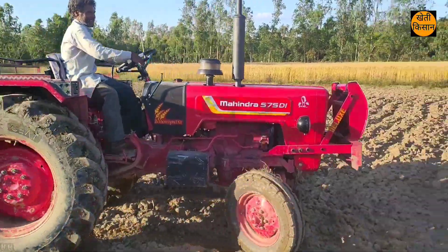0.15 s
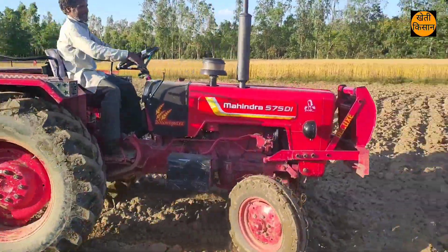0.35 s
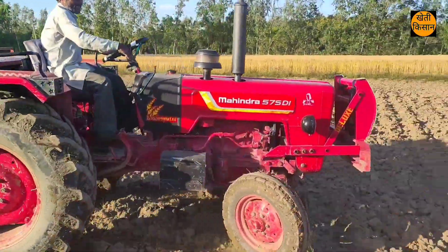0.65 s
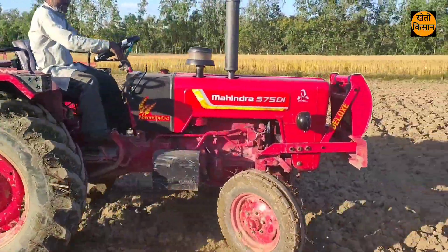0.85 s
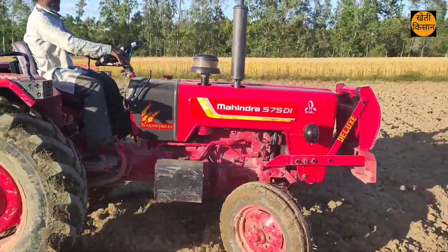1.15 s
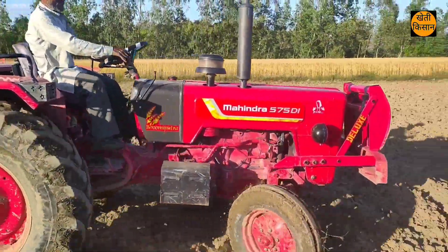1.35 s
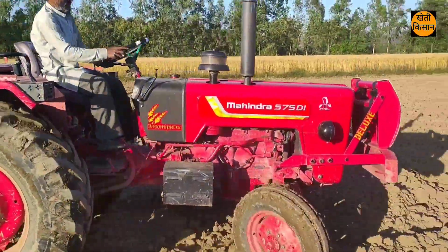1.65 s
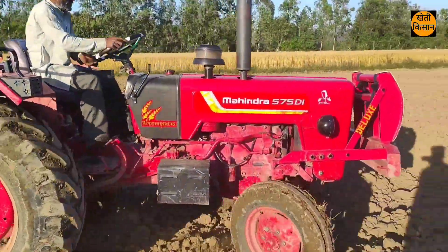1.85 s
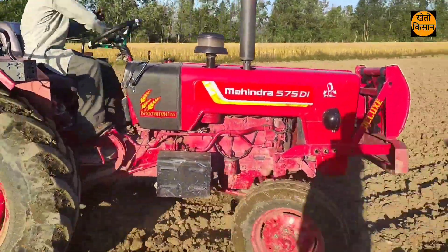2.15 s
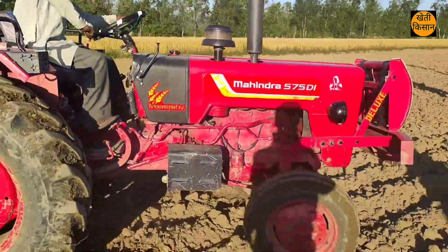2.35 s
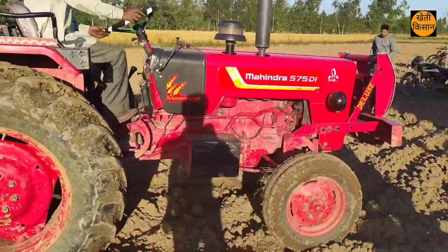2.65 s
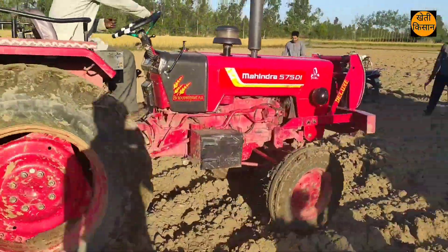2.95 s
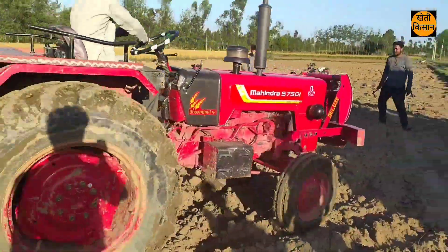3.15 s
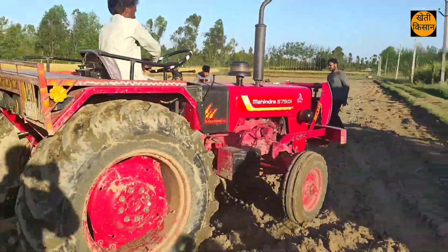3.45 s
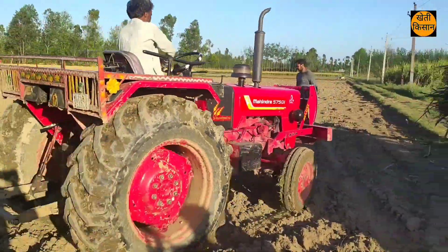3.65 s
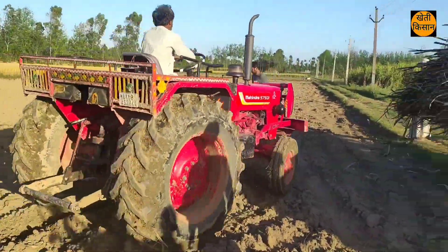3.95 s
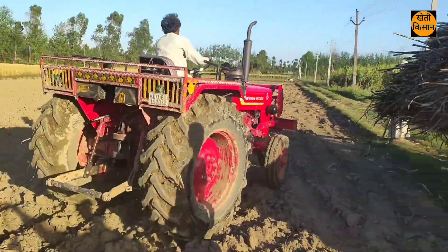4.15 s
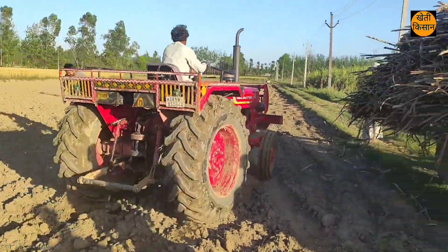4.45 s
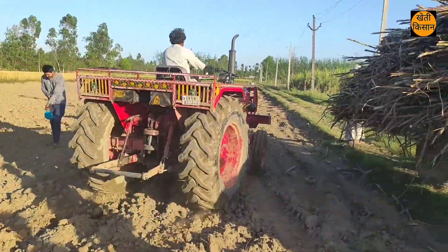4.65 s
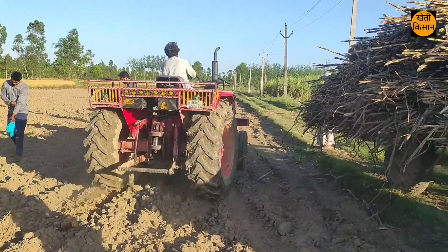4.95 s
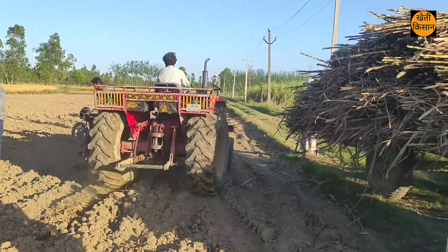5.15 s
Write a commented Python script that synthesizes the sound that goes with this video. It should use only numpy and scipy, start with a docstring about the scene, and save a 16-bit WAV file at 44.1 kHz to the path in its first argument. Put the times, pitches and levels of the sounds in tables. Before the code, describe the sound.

A four-cylinder diesel tractor works close by in an open field, recorded outdoors in stereo with little reverberation. Around thirty firings a second make a deep fluttering thump with barking exhaust, low roar and metallic clatter. A couple of bright clinks come at the start; the speed rises briefly, then sags to its slowest near 0.75 s. From about 0.9 s it picks up and pulls hard, the treble knock crisp and ringing, sharpest from 1.2 to 1.9 s. Panels rattle, a hollow body boom comes and goes, and a faint hum swells at 1 s. Small iron clinks follow at 2.1 s and around 2.8 s. From 2.3 to 4 s it turns away and the knock dulls. Distant hollow toots, about four per second, become clearer from 2.8 s. After 4.4 s the engine revs noticeably higher; wind bumps the microphone from 4.7 s and the linkage clanks at 5.1 s.

```python
"""A four-cylinder diesel tractor pulls past at close range and drives off over a ploughed field.
From the start each firing gives an exhaust thump and bark, a burst of clatter and, under load, a hiss-like knock.
Far off, a slow stationary engine toots through its exhaust pot, like a blown bottle, about four times a second.
As the tractor passes, resonant panels rattle, iron clinks and the body booms at random; a faint tone hums once.
Then it turns its back, dulling the knock; near the end the engine speeds up, wind bumps and the linkage clanks."""
import sys
import numpy as np
from scipy import signal
from scipy.fft import rfft, irfft, next_fast_len
from scipy.io import wavfile
from scipy.ndimage import uniform_filter1d

SR = 44100
rng = np.random.default_rng(int(sys.argv[2]) if len(sys.argv) > 2 else 0)


def inscribe(sig):
    """Save sig as 16-bit PCM at rate SR to the path in sys.argv[1].

    A 1-D sig is mono; a 2-D sig holds one channel per row.
    Samples are clipped to [-1, 1] before scaling.
    """
    pcm = np.round(np.clip(np.atleast_2d(sig).T, -1, 1) * 32767)
    wavfile.write(sys.argv[1], SR, pcm.astype(np.int16))


N = 233579
TIME = np.arange(N) / SR

# engine speed, hunting around the governor's setting: [t/s, firing rate/Hz]
FIRING_RATE = [(0.0, 27.82), (0.304, 32.7), (0.534, 26.08), (0.564, 26.21), (0.743, 23.84), (1.345, 31.58),
               (1.467, 30.47), (1.913, 32.07), (2.057, 30.87), (2.259, 32.41), (2.661, 33.5),
               (2.812, 30.99), (2.955, 34.35), (3.07, 31.64), (3.309, 32.1), (3.444, 34.61), (3.629, 30.73),
               (3.846, 33.77), (4.105, 31.66), (4.288, 33.33), (4.483, 39.77), (4.904, 44.95), (5.3, 42.24)]
# engine along the drive: [t/s, roar before load and trim/dB, clatter re roar before load and trim/dB, dullness 0-1]
ENGINE_LEVEL = [(0, -33, -11, 0.96), (.25, -31, -9, 0.7), (.45, -36, -8, 0.65), (.8, -35, -8.5, 0.62),
                (1.0, -32, -9.5, 0.13), (1.45, -31.5, -9.5, 0.2), (1.8, -30, -9, 0.33),
                (2.15, -31.5, -6.5, 0.24), (2.7, -31.5, -7.5, 0), (2.92, -30, -11.5, 0.25),
                (3.0, -34, -11, 0.46), (3.1, -30.5, -12.5, 0.73), (3.23, -33, -13.5, .6),
                (3.4, -32, -9.5, 0.75), (3.49, -34, -9.5, 0.86), (3.7, -31.5, -12.5, .8),
                (4.2, -35, -10, 0.8), (4.55, -31, -12.5, 0.89), (4.9, -30.5, -14, 0.87),
                (5.08, -33, -12.5, 0.91), (5.3, -37.5, -12, 0.89)]
# spectrum of the combustion knock: [f/Hz, relative density/dB]
KNOCK_SPECTRUM = [(1500, -17), (2600, -24), (3800, -24.5), (4900, -16.5), (5500, -13.5), (5850, -6),
                  (6300, -6), (6680, -6.5), (6900, -1.5), (7300, -4), (7600, -2.5), (8000, -20.5),
                  (9000, -18.5)]
# modes of the engine's metal that the knock rings: [f/Hz, width/Hz, level/dB]
METAL_MODES = [(4280, 90, 1), (5630, 120, -5.5), (6410, 120, 0.5), (6730, 120, -1.5), (7170, 83, 0.5),
               (7440, 170, 2.5), (7600, 150, -6.5)]
# the two microphone ports: [f/Hz, likeness 0-1, left lead/rad, left minus right/dB]
PORT_RESPONSE = [(59.7, 0.99, 1, 2.5), (227, 1, -1.43, -1.5), (338, 0.96, 0.59, 0.5), (493, 0.5, 0.68, 0),
                 (610, 0.99, 0.88, -6.5), (900, 0.54, -0.5, 3.5), (1270, 0.4, -2, -2), (1890, 0.35, -2, 1),
                 (2900, 0.13, -3, 1), (4560, 0.3, -5.5, -4), (6800, 0.3, -5, -14), (8000, 0.4, -4.5, -25.5)]


def amp(db):
    """Decibels are logarithmic: 20 dB is a tenfold gain in amplitude."""
    return 10 ** (np.asarray(db) / 20)


def evened(x):
    """Normalisation to rms 1 (of the mid signal, for a pair)."""
    mid = np.atleast_2d(x).mean(0)
    return x / np.sqrt(np.mean(mid ** 2) + 1e-20)


def curve(rows, axis=1):
    """Linear interpolation of one column of a time table, at every sample."""
    rows = np.array(rows)
    return np.interp(TIME, rows[:, 0], rows[:, axis])


def read(rows, hz, axis=1):
    """Interpolation of one column of a frequency table, on a log axis."""
    rows = np.array(rows)
    return np.interp(np.log(hz + 1), np.log(rows[:, 0] + 1), rows[:, axis])


def add(mix, s, sound):
    """Superposition: mixes a sound in at a time."""
    part = mix[max(round(s * SR), 0):][:len(sound)]
    part += sound[:len(part)]


def drift(rate_hz):
    """Low-passed Gaussian noise of rms 1, varying at rates up to about the given one."""
    size = next_fast_len(N)
    hz = np.fft.rfftfreq(size, 1 / SR)
    spectrum = rfft(rng.standard_normal(size)) / (1 + (hz / rate_hz) ** 4)
    return evened(irfft(spectrum, size)[:N])


def noise(spectrum, likeness=1):
    """Coloured noise, partly coherent between two spaced ports, with phase and level differences."""
    size = next_fast_len(N)
    hz = np.fft.rfftfreq(size, 1 / SR)
    a, b = rfft(rng.standard_normal((2, size)))
    same = np.clip(likeness * read(PORT_RESPONSE, hz), 0, 1)
    lead = np.exp(1j * read(PORT_RESPONSE, hz, axis=2))
    tilt = amp(read(PORT_RESPONSE, hz, axis=3))
    left = tilt * lead * (same * a + np.sqrt(1 - same ** 2) * b)
    pair = np.array([left, a]) / np.sqrt(1 + tilt ** 2)
    return evened(irfft(pair * amp(read(spectrum, hz)), size)[:, :N])


def sides(hz):
    """Level difference between the ports: left and right gains at one frequency, of mean 1."""
    gains = np.array([[amp(read(PORT_RESPONSE, hz, axis=3))], [1]])
    return gains / gains.mean()


def ring(x, modes):
    """Modal resonance: convolution with decaying cosines [f/Hz, width/Hz, level/dB]."""
    t = np.arange(SR // 20) / SR
    response = sum(amp(db) * np.exp(-np.pi * width * t) * np.cos(2 * np.pi * hz * t)
                   for hz, width, db in modes)
    return signal.oaconvolve(x, response[None], axes=1)[:, :x.shape[1]]


def bursts(firings, start, rise, decay, between, uneven_db):
    """Cyclic excitation of rms 1: jumps and decays once a firing (times as shares of a firing)."""
    index, age = np.divmod(firings - start + 2, 1)
    size = amp(uneven_db * np.clip(rng.standard_normal(256), -2, 2))[index.astype(int)]
    shape = (1 - np.exp(-(age / rise) ** 2)) * np.exp(-age / decay)
    return evened(size * shape + between)


def turned():
    """Source aspect: 0 while the tractor is side-on, 1 once heard from behind."""
    start_s, end_s = 2.3, 4.03
    return np.clip((TIME - start_s) / (end_s - start_s), 0, 1)


def fuel_db():
    """Force balance: fuel meets the drag, rising as the engine gains speed and falling as it slows."""
    # drag of the soil and drive train: [t/s, level re full load/dB]
    drag = [(0, -34), (.09, -3.5), (.15, -4.5), (.3, -15), (.42, -11.5), (.49, -18.5), (.56, -19.5),
            (.64, -22), (.76, -21.5), (.835, -11.5), (.875, -31.5), (.915, -4), (1.2, -6), (1.45, -4.5),
            (1.8, -3.5), (1.96, -5), (2.22, -8.5), (2.45, -15), (2.9, -11), (3.02, -11), (3.12, -4.5),
            (3.25, -14.5), (3.38, -13), (3.53, -13), (3.8, -10), (4.5, -10.5), (4.9, -10), (5.3, -27)]
    averaging_s = 0.05  # the governor's reaction time
    db_per_accel = 0.6344  # dB per firing per second gained in a second
    accel_limit = 12.1  # firings/s^2 at which the fuel rack nears its stops
    accel = uniform_filter1d(np.gradient(curve(FIRING_RATE)) * SR, round(averaging_s * SR))
    return curve(drag) + db_per_accel * accel_limit * np.tanh(accel / accel_limit)


def wind():
    """Turbulent pressure: short low swells, mostly independent at each port, strongest in the deep bass."""
    # bumps on the microphone: [t/s, level/dB, length/s, top f/Hz, left minus right/dB]
    gusts = [(4.737, -23, .018, 420, -16.5), (4.757, -25, .04, 110, -18), (4.888, -20.5, .03, 150, -10),
             (4.908, -19, .03, 400, -14), (4.912, -25, .03, 61, 10), (4.932, -17, .02, 220, 4),
             (4.96, -18, .06, 131, -11), (5.028, -22.5, .026, 202, -22.5), (5.072, -21, .035, 151, 3),
             (5.16, -24, .17, 176, -5), (5.23, -25.5, .03, 130, 14)]
    out = np.zeros((2, N))
    hz = np.fft.rfftfreq(SR, 1 / SR)
    for s, db, length, top_hz, pan_db in gusts:
        near = abs(TIME - s) < 1.5 * length
        swell = np.exp(-(2 * (TIME[near] - s) / length) ** 2)
        spectra = rfft(rng.standard_normal((3, SR))) / (1 + (hz / top_hz) ** 4)
        spectra = spectra / np.sqrt(1 + 2 * hz / top_hz)
        left, right, both = irfft(spectra)[:, :len(swell)]
        eddies = np.array([evened(swell * (.4 * both + .9 * own)) for own in (left, right)])
        port_db = db + np.array([[pan_db], [-pan_db]]) / 2
        out[:, near] += amp(port_db) * np.sqrt(np.mean(swell ** 2)) * eddies
    return out


def toot(hz, swell, sag):
    """Cavity resonance: a rough puff blows the exhaust pot like a bottle; the note sags as it dies."""
    t = np.arange(SR // 7) / SR
    pitch = hz * (1 + 0.0036 * rng.standard_normal())
    cycles = pitch * (t - sag * t ** 2) + rng.random()
    band = signal.butter(4, [280, 930], "band", fs=SR, output="sos")
    puff = evened(signal.sosfilt(band, rng.standard_normal(len(t))))
    envelope = (t / swell) ** 2 * np.exp(2 - 2 * t / swell)
    return envelope * (np.sin(2 * np.pi * cycles) + amp(-10) * puff)


def far_engine(count=22):
    """Periodic excitation: a toot each firing, and a weaker, higher one about half a cycle later."""
    # strength, hidden at times while the tractor passes in front: [t/s, level/dB]
    toot_level = [(.24, -32), (.48, -32.5), (.72, -27), (.95, -29), (1.42, -29), (1.66, -37), (1.9, -44),
                  (2.13, -29.5), (2.37, -40), (2.6, -31), (2.84, -25), (3.1, -25), (3.31, -24),
                  (3.55, -30.5), (3.8, -26), (4.03, -23), (4.27, -24), (4.5, -29), (4.74, -25.5),
                  (4.98, -26.5), (5.22, -27.5)]
    start_s, gap_s, stretch_s = .241, .2335, .00015  # the gaps lengthen slightly
    uneven_db = -1.5
    out = np.zeros(N)
    for k, luck in enumerate(rng.standard_normal(count)):
        s = start_s + gap_s * k + stretch_s * k ** 2
        db = np.interp(s, *np.transpose(toot_level)) + uneven_db * luck
        add(out, s - .006, amp(db) * toot(hz=422, swell=0.014, sag=0.41))
        add(out, s + .118, amp(db - 6) * toot(hz=452, swell=.012, sag=.6))
    return out * amp(0) * np.array([[1], [1]]) * amp([[-.5], [.5]])


def hum():
    """Amplitude modulation: one faint note of wavering phase swells and fades."""
    # [centre t/s, half-length/s, f/Hz, level/dB]
    s, half_length, hz, db = (1, 0.17, 453, -37)
    swell = np.exp(-((TIME - s) / half_length) ** 4)
    return amp(db) * swell * np.sin(2 * np.pi * hz * TIME + .3 * drift(20))


def clink(db, hz, t60, share):
    """Impact of iron on iron: one mode decays exponentially, with a share of chatter around it."""
    t, share = np.arange(SR // 4) / SR, np.clip(share, 0, 1)
    tone = np.sqrt(2) * np.sin(2 * np.pi * (hz * t + rng.uniform(0, .3, (2, 1))))
    chatter = evened(ring(rng.standard_normal((2, len(t))), [(hz, .2 * hz, 0)]))
    envelope = amp(db - 60 * t / t60) * (1 - np.exp(-t / .001))
    return (np.sqrt(1 - share) * tone + np.sqrt(share) * chatter) * envelope


def ironwork():
    """Modal superposition: single clinks over the bumps, and one linkage clank that rings all its modes."""
    # clinks of loose ironwork: [t/s, level/dB, f/Hz, t60/s]
    clinks = [(.05, -31, 6960, 0.03), (0.085, -29, 5470, .04), (0.086, -27, 7200, 0.03),
              (1.38, -42.5, 2290, 0.11), (2.122, -36.5, 2070, 0.065), (2.127, -33.5, 5740, 0.066),
              (2.287, -45, 2960, 0.055), (2.561, -40, 5670, 0.063), (2.772, -37, 2920, 0.052),
              (2.786, -38, 2660, 0.11), (3.87, -50, 2770, 0.1), (4.129, -43.5, 2900, 0.053),
              (4.378, -42, 2600, 0.044), (4.535, -42.5, 2430, 0.093), (4.948, -47.5, 2690, 0.081),
              (5.127, -44, 2505, 0.13)]
    # modes of the rear linkage: [f/Hz, level/dB, t60/s]
    linkage = [(3200, -49.5, 0.21), (3640, -54, 0.11), (4560, -50.5, 0.17), (5950, -46, 0.06),
               (6930, -41.5, 0.037), (7390, -53, 0.36)]
    clank_s = 5.076
    hits = [(*row, .15) for row in clinks]  # the last entry is the share of chatter
    hits += [(clank_s, db, hz, t60, .45) for hz, db, t60 in linkage]
    out = np.zeros((2, N))
    for s, db, hz, t60, share in hits:
        for port, heard in zip(out, sides(hz) * clink(db, hz, t60, share)):
            add(port, s, heard)
    return out


def panels(firings):
    """Forced plate vibration: uneven ticks ring loose sheet metal, densest after each firing."""
    # modes of the thin panels: [f/Hz, width/Hz, level/dB]
    panel_modes = [(2205, 110, 2), (2730, 83, 0), (3070, 130, 1), (3740, 170, -5.5), (4640, 100, -3),
                   (5260, 57, -2), (5800, 220, -1.5), (6720, 110, 6)]
    # rattle as the bonnet passes: [t/s, level/dB]
    rattle = [(0, -62), (.15, -59), (.36, -62), (.85, -65), (1.05, -46.5), (1.4, -49.5), (1.8, -51),
              (2.15, -55), (2.42, -63), (2.57, -42.5), (2.7, -63), (2.87, -46), (3.0, -63), (3.4, -58.5),
              (3.52, -63.5), (3.7, -57), (4.0, -67), (4.8, -57.5), (5.3, -76)]
    chance = 130 / SR * bursts(firings, start=.33, rise=.08, decay=.25, between=.2, uneven_db=4)
    size = amp(4.5 * np.minimum(rng.exponential(1, N), 2.5)) * rng.choice([-1, 1], (2, N))
    out = np.zeros((2, N))
    for hz, width, db in panel_modes:
        ticks = size * (rng.random(N) < chance)
        out += sides(hz) * ring(ticks, [(hz, width, db)])
    return amp(curve(rattle)) * evened(out)


def boom():
    """Narrow-band noise: random quadrature parts make a hollow bodywork boom that slides in pitch."""
    # the boom as the tractor passes: [t/s, f/Hz, level/dB]
    boom_track = [(0, 300, -46), (.85, 290, -45.5), (1.0, 288, -35), (1.15, 295, -34), (1.3, 330, -42.5),
                  (1.75, 320, -44.5), (2.0, 350, -38), (2.42, 355, -38), (2.55, 285.3, -34.5),
                  (2.72, 320, -39.5), (2.9, 340, -34.5), (3.1, 340, -40), (3.25, 320, -45.5),
                  (3.55, 280, -33.5), (3.66, 330, -49), (4.4, 340, -40.5), (4.52, 330, -38),
                  (4.63, 345, -48), (5.3, 350, -39.5)]
    width_hz = 26  # reach of the band to each side of its centre
    phase = 2 * np.pi * np.cumsum(curve(boom_track)) / SR + np.array([[.4], [0]])
    band = drift(width_hz) * np.cos(phase) + drift(width_hz) * np.sin(phase)
    return amp(curve(boom_track, axis=2)) * evened(band)


def hard_knocks():
    """Impulsive combustion: a charge ignites all at once, and its dry crack rings the metal's modes."""
    # knocks that stand out from the rest: [t/s, level/dB]
    sharp_knocks = [(.278, -36.5), (0.308, -41), (0.793, -40), (1.021, -33.5), (1.232, -34), (1.327, -30),
                    (1.424, -37), (1.491, -38), (1.555, -30), (1.585, -34), (1.682, -32), (1.715, -39),
                    (1.747, -32), (1.782, -27), (1.844, -31), (2.097, -37), (2.222, -33), (2.588, -43),
                    (2.838, -43), (2.867, -44)]
    rise_s, decay_s = 0.0016, 0.0025
    t, out = np.arange(SR // 25) / SR, np.zeros((2, N))
    hiss = noise(KNOCK_SPECTRUM)
    shape = (1 - np.exp(-(t / rise_s) ** 2)) * np.exp(-t / decay_s)
    mode_luck = rng.standard_normal((len(sharp_knocks), len(METAL_MODES)))
    for (s, db), luck in zip(sharp_knocks, mode_luck):
        crack = shape * hiss[:, round(s * SR):][:, :len(t)]
        # each knock has its own mix of modes
        modes = [(hz, width, mode_db + 3 * k) for (hz, width, mode_db), k in zip(METAL_MODES, luck)]
        blow = evened(evened(crack) + 0.87 * evened(ring(crack, modes)))
        blow = blow * np.sqrt(2 * decay_s / t[-1])
        for port, heard in zip(out, amp(db) * blow):
            add(port, s, heard)
    return out


def valve_gear(firings):
    """Impulse response: ticks of very uneven size ring the block, mostly just after each firing."""
    # modes of the engine block: [f/Hz, width/Hz, level/dB]
    block = [(1241, 55, 4), (1587, 48, -2), (1748, 110, 4), (2139, 70, -1), (2400, 330, -7),
             (2964, 80, -5.5)]
    chance = 160 / SR * bursts(firings, start=0.41, rise=0.088, decay=0.27, between=0.23, uneven_db=5.5)
    size = amp(5.9 * np.minimum(rng.exponential(1, (2, N)), 3)) * rng.choice([-1, 1], (2, N))
    return evened(sum(ring(size * (rng.random((2, N)) < chance), [mode]) for mode in block))


def engine_body(firings, fuel):
    """Modulated noise: upper roar and block clatter pulse with the firings over a steadier low roar."""
    # roar from the side and from the rear, and block clatter: [f/Hz, relative density/dB]
    roar_side = [(60, -5.5), (130, -3.5), (210, -1.5), (290, -0.5), (360, -1), (430, -5.5), (540, -7.5),
                 (720, -5), (950, -4), (1100, -20), (1400, -63.5), (2500, -58.5)]
    roar_rear = [(60, 4.5), (130, -1.5), (210, -1.5), (290, -1.5), (360, -1.5), (430, -1), (540, -6.5),
                 (720, -3), (900, -11.5), (1050, -26), (1400, -23.5), (2500, -76.5)]
    clatter_spectrum = [(600, -23), (1000, 8), (1240, 4.5), (1400, 3.5), (1620, 3), (2000, 3), (2130, -0.5),
                        (2350, 1), (2950, -4), (3400, -6), (4300, -10), (6000, -10), (8000, -41)]
    split_hz = 570  # below this the roar lingers between firings; above it, it chugs
    roar_per_fuel, clatter_per_fuel = 0.037, 0.066  # dB gained for each dB of fuel
    level = amp(curve(ENGINE_LEVEL) + roar_per_fuel * fuel)
    dull = np.clip(curve(ENGINE_LEVEL, axis=3), 0, 1)
    roar = np.sqrt(1 - dull) * noise(roar_side) + np.sqrt(dull) * noise(roar_rear)
    low = signal.sosfiltfilt(signal.butter(4, split_hz, fs=SR, output="sos"), roar)
    throb = bursts(firings, start=.32, rise=.12, decay=.5, between=1.8, uneven_db=3)
    chug = bursts(firings, start=.34, rise=.09, decay=.45, between=.55, uneven_db=1.5)
    clack = bursts(firings, start=.29, rise=.16, decay=.22, between=.35, uneven_db=3.5)
    clatter = noise(clatter_spectrum) * clack + amp(-2.5) * valve_gear(firings)
    clatter_db = -4.5 + curve(ENGINE_LEVEL, axis=2) + clatter_per_fuel * fuel
    pulsing_roar = low * throb + (roar - low) * chug
    return level * (amp(2.5) * pulsing_roar + amp(clatter_db) * clatter)


def knock(firings, fuel):
    """Combustion shock: a treble crack and ragged rebound under load blur into a softer chuff as it falls."""
    # strength in each cylinder, in firing order: [level/dB]
    cylinder_db = [-4, 0, .8, .3]
    full_load_db, shield_db = -37.5, -13  # side-on; change when heard from behind
    coast_db = -32  # knock that remains with no fuel, re the tabled roar
    pulling = amp(full_load_db + fuel + shield_db * turned())
    coasting = amp(curve(ENGINE_LEVEL) + coast_db)
    load_db = 20 * np.log10(np.hypot(pulling, coasting))
    hard = np.clip((load_db + 50) / 13, 0, 1)
    beat = firings + .015 * drift(20)  # the timing wanders
    cylinder = np.array(cylinder_db)[(beat + 1.7).astype(int) % 4]
    crack = bursts(beat, start=.37, rise=.04, decay=.075, between=.02, uneven_db=1)
    rebound = bursts(beat, start=.5, rise=.05, decay=.15, between=.025, uneven_db=2)
    rebound = rebound * amp(3 * drift(300))
    chuff = bursts(beat, start=.34, rise=.06, decay=.28, between=.18, uneven_db=2)
    sharp_power = .85 * crack ** 2 + .15 * evened(rebound) ** 2
    blow = np.sqrt(hard * sharp_power + (1 - hard) * chuff ** 2)
    # the drive of each mode wavers, so the blows favour different modes
    drive = blow * noise(KNOCK_SPECTRUM)
    metal = evened(sum(ring(drive * amp(2.8 * drift(20)), [mode]) for mode in METAL_MODES))
    return amp(load_db + hard * cylinder) * evened(blow * noise(KNOCK_SPECTRUM) + amp(0.5) * metal)


def orders(firings, table, lag, waver):
    """Fourier synthesis: engine orders, coloured by the pipe, line up in one pulse; each wavers by itself."""
    # response of the exhaust pipe: [f/Hz, gain/dB]
    pipe = [(15, -19), (25, -9), (32, -3.5), (41, 1), (63, 1.5), (85, 0.5), (160, -0.5), (195, -6.5),
            (230, -8), (350, -1.5)]
    rate = curve(FIRING_RATE)
    total = np.zeros(N)
    for k, db in table:
        level = amp(db + read(pipe, k * rate)) * (1 + waver * drift(15.0))
        total += level * np.cos(2 * np.pi * k * (firings - lag) + waver * drift(27))
    return evened(total)


def exhaust(firings, fuel):
    """Pulsating flow: a bark leads each firing, a deep suction swing follows, and turbulence rumbles."""
    # engine orders of the deep thump and of the bark above it: [multiple of firing rate, relative level/dB]
    thump_orders = [(.5, 0.5), (1, 10), (1.5, -15), (2, 7.5), (2.5, -35.5)]
    bark_orders = [(3, 5.5), (3.5, -21), (4, 7.5), (4.5, -10.5), (5, 7), (5.5, -20), (6, 3.5), (7, -13),
                   (8, -6.5), (9, -8), (10, -13.5), (11, -9)]
    # spectrum of the turbulence: [f/Hz, relative density/dB]
    rumble_spectrum = [(12, -8.5), (28, 10.5), (60, 3.5), (110, 8.5), (200, -31), (400, -38), (1000, -59.5)]
    # how well the exhaust carries to the microphone: [t/s, thump/dB, bark before load and speed/dB]
    carry = [(0, -30, -34.5), (.22, -23.5, -29.5), (.5, -23, -27), (.85, -23.5, -31.5), (1.1, -23.5, -28),
             (1.8, -22.5, -27), (2.2, -23.5, -25.5), (2.6, -22.5, -26), (2.9, -25.5, -29.5),
             (3.0, -29, -27.5), (3.12, -26.5, -39), (3.3, -25, -34.5), (4.1, -23.5, -33.5),
             (4.6, -23.5, -39.5), (4.9, -24.5, -39), (5.3, -18.5, -25)]
    knee_db = -15.5  # the thump levels off once the fuel passes the knee
    bark_per_fuel, bark_per_speed = 0.43, 0.57  # dB per dB of fuel; dB per extra firing per second
    cruise_hz = 32
    rumble_db, rumble_rear_db = -19.5, 5.5  # re the thump; change when heard from behind
    level = amp(curve(carry)) / np.sqrt(1 + amp(knee_db - fuel) ** 2)
    thump = level * orders(firings, thump_orders, lag=0.682, waver=0.039)
    bark_db = curve(carry, axis=2) + bark_per_fuel * fuel
    bark_db = bark_db + bark_per_speed * (curve(FIRING_RATE) - cruise_hz)
    bark = amp(bark_db) * orders(firings, bark_orders, lag=0.35, waver=0.15)
    eddies = noise(rumble_spectrum, likeness=.45)
    rumble = amp(rumble_db + rumble_rear_db * turned()) * level * eddies
    return (bark - thump) * amp([[-.8], [.8]]) + rumble


def scene():
    """Common excitation: one firing count times the tractor's engine, and the fuel sets its strength."""
    firings, fuel = np.cumsum(curve(FIRING_RATE)) / SR, fuel_db()
    engine = exhaust(firings, fuel) + engine_body(firings, fuel) + knock(firings, fuel) + hard_knocks()
    tractor = engine + boom() + panels(firings) + ironwork()
    return tractor + hum() + far_engine() + wind()


def record(dry):
    """Band limitation: the microphone drops the deepest bass, then a linear-phase filter cuts the top."""
    thinned = signal.sosfilt(signal.butter(1, 8, "high", fs=SR, output="sos"), dry)
    low_pass = signal.firwin(101, 8050, window=("kaiser", 5), fs=SR)
    return signal.oaconvolve(thinned, low_pass[None], "same", axes=1)


dry = scene()
out = record(dry)
inscribe(out)
```